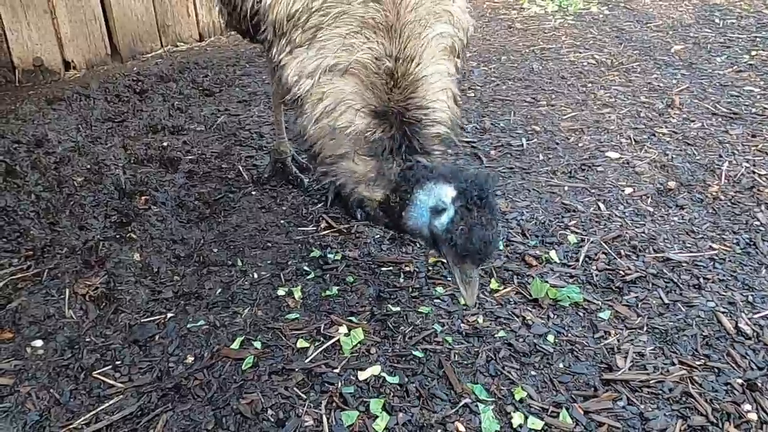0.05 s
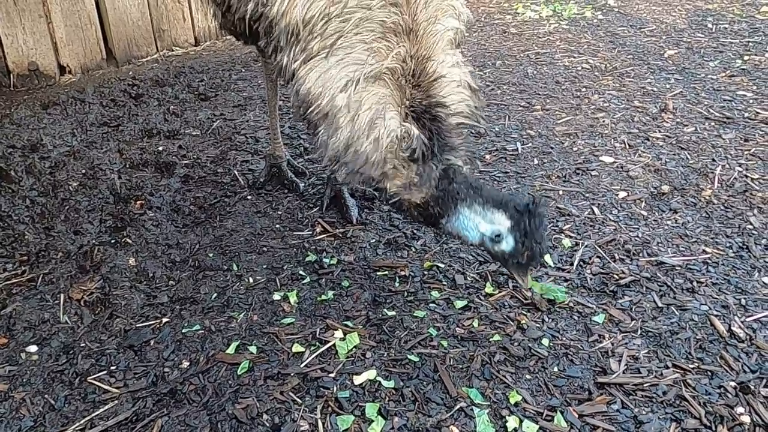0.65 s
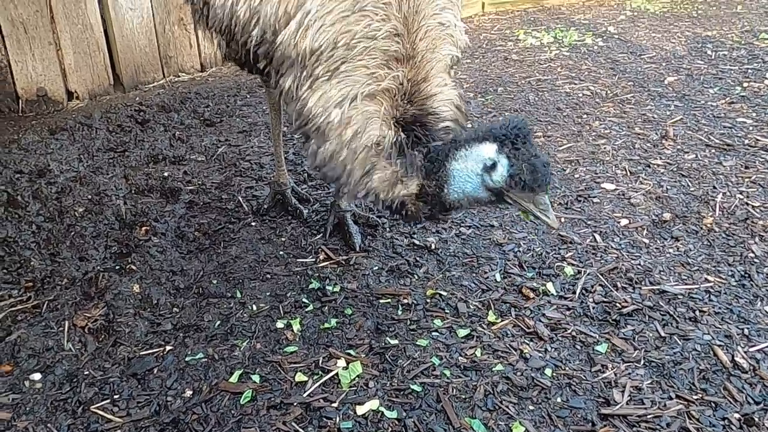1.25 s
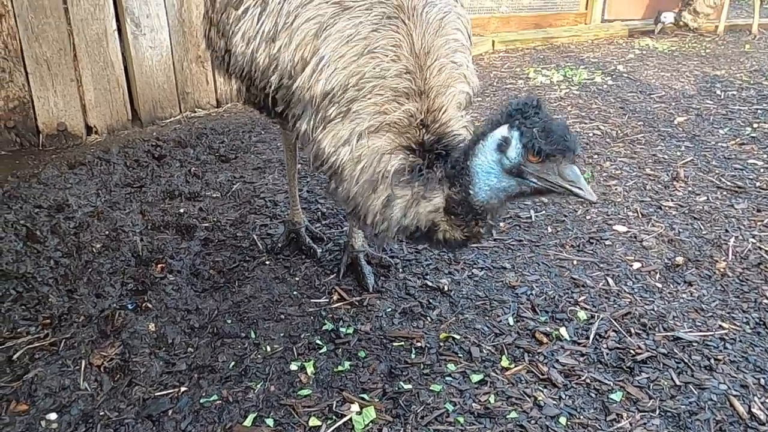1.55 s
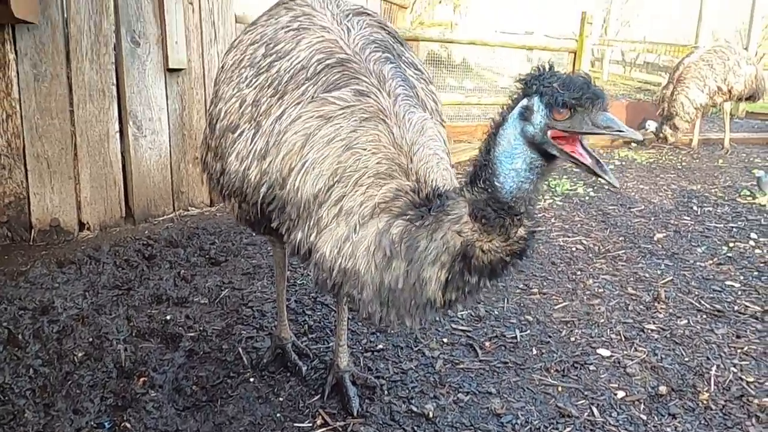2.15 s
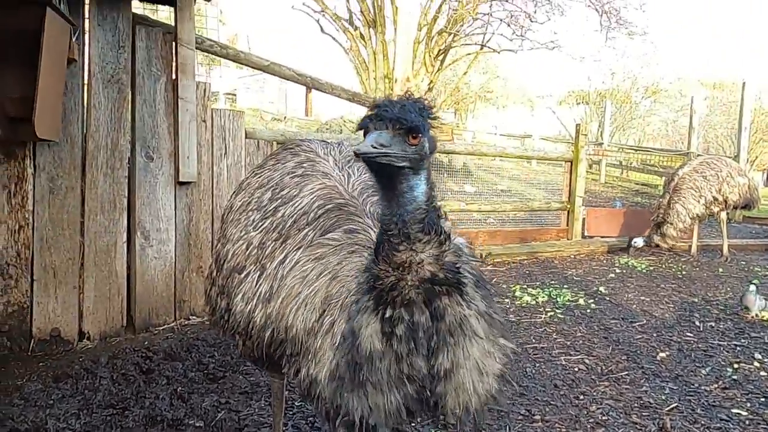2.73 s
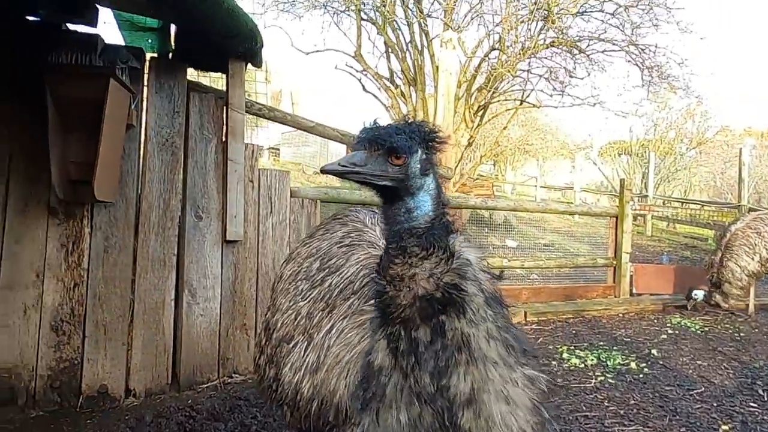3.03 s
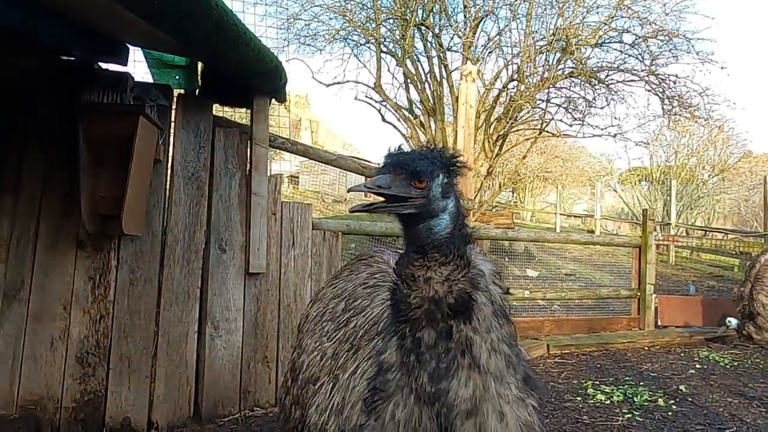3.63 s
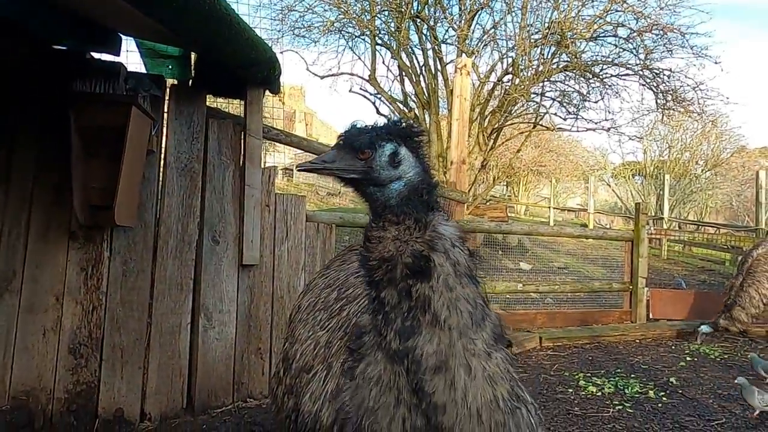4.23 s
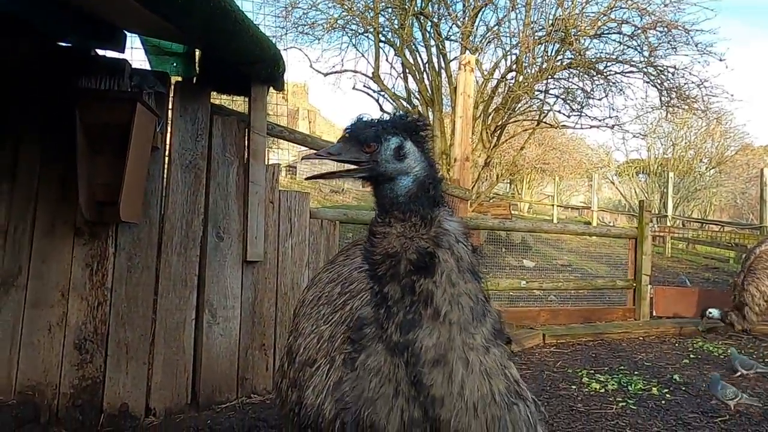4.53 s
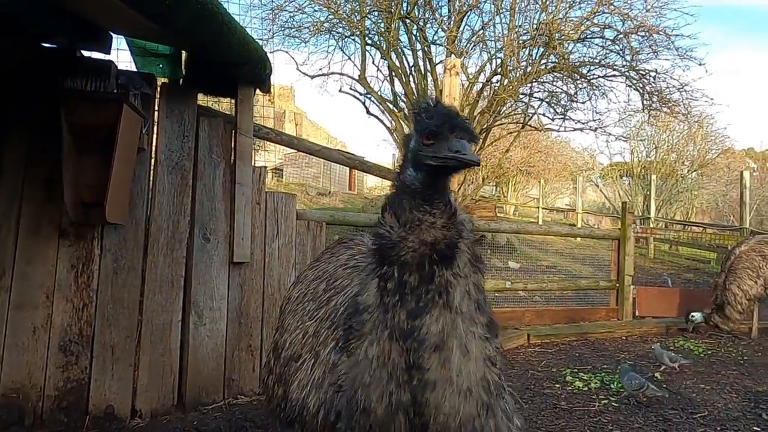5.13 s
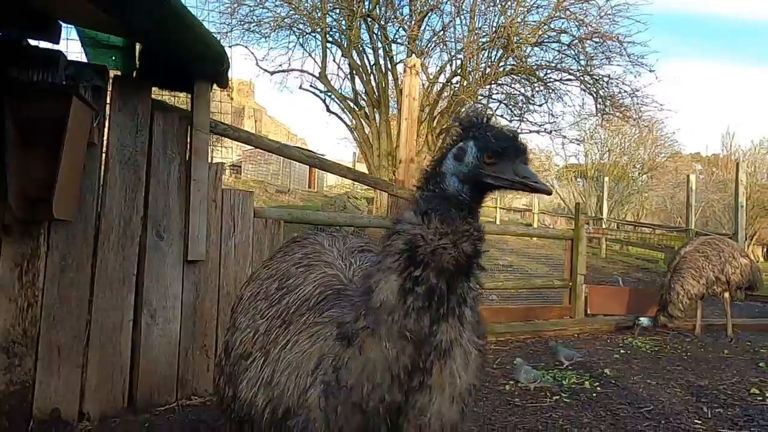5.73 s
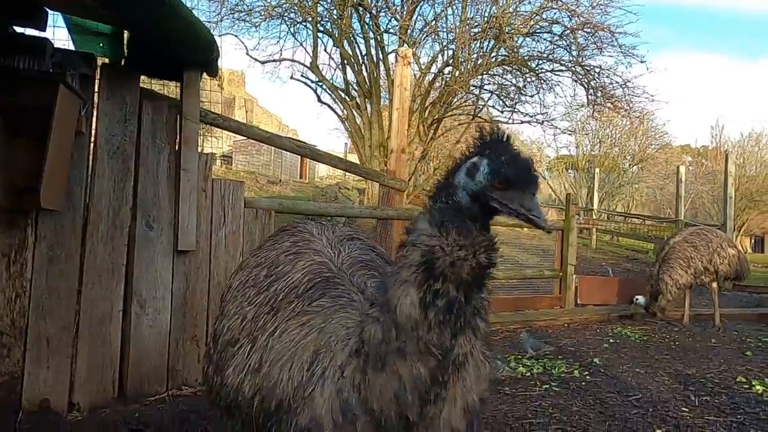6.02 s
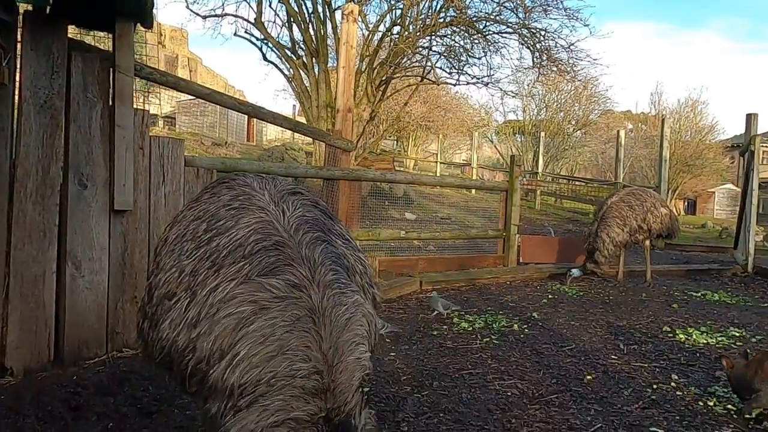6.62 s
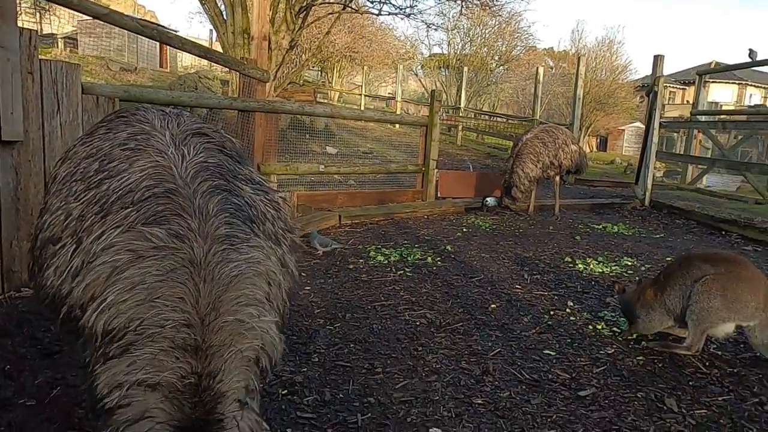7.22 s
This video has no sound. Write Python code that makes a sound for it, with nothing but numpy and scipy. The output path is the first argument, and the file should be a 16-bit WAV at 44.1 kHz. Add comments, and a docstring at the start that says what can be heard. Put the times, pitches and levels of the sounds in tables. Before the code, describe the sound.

In an outdoor yard, a small songbird slightly to the right sings thin, high whistles and then a quick warble. Wind then rumbles and thumps on the microphone, which takes a few dull knocks, louder than the song. After a lull the bird sings a second, buzzier phrase through another gust. Large birds faintly rustle and tap in wood chips, and distant traffic hums throughout.

```python
"""A small songbird sings two phrases of whistles, scoops, slurs and buzzes in a yard with wooden fences.
It sits a little right of the microphone; each note is a wavering near sine, raspier the faster it glides.
Large birds rustle and tap in the wood chips, the fences echo them and the song, and far traffic hums.
Wind rumbles and thumps right on the microphone, which takes a few knocks as it swings.
After the strongest gust the stereo image narrows to mono."""
import sys
import numpy as np
from scipy import signal
from scipy.fft import rfft, irfft, next_fast_len
from scipy.io import wavfile

SR = 44100
rng = np.random.default_rng(int(sys.argv[2]) if len(sys.argv) > 2 else 0)


def store_wav(level_fs):
    """Save 16-bit WAV to argv[1]."""
    pcm = np.round(np.clip(np.atleast_2d(level_fs), -1, 1) * 32767)
    wavfile.write(sys.argv[1], SR, pcm.T.astype(np.int16))


N = 325017
TIME = np.arange(N) / SR


def gain_of(db):
    """Decibels to a factor."""
    return 10 ** (np.asarray(db) / 20)


def unit_rms(x):
    """Scales to rms 1."""
    return x / np.sqrt(np.mean(x ** 2) + 1e-20)


def curve(rows):
    """Joins (time, value) rows by straight lines."""
    return np.interp(TIME, *np.transpose(rows))


def spectrum_at(rows, hz):
    """Reads (frequency, value) rows on a log-frequency axis."""
    f, value = np.transpose(rows)
    return np.interp(np.log(hz + 1), np.log(f + 1), value)


def add(mix, s, sound):
    """Mixes a sound in at time s."""
    part = mix[..., max(round(s * SR), 0):][..., :sound.shape[-1]]
    part += sound[..., :part.shape[-1]]


def filtered(x, gain):
    """Filters x by a gain that is a function of frequency."""
    size = next_fast_len(x.shape[-1])
    return irfft(rfft(x, size) * gain(np.fft.rfftfreq(size, 1 / SR)), size)[..., :x.shape[-1]]


def rolloff(f, corner_hz, slope):
    """Low-pass gain, one half at the corner."""
    return 1 / (1 + (f / corner_hz) ** slope)


def wander(count, hz):
    """Smooth random drift of rms about 1 that moves at up to hz."""
    noise = rng.standard_normal(max(count, SR // 4) + 4096)
    return unit_rms(filtered(noise, lambda f: rolloff(f, hz, 4)))[:count]


def noise_pair(apart):
    """White noise at the microphone's two ports: a shared part, plus and minus an unshared one."""
    mid, side = rng.standard_normal((2, N))
    return np.array([mid + apart * side, mid - apart * side])


# Far traffic as it reaches the yard: (frequency [Hz], relative level [dB])
TRAFFIC_SPECTRUM = [(30, 7), (180, 13.5), (300, 5.5), (420, -1), (650, -5.5), (1030, -0.5), (1550, -5),
                    (2000, -18), (2600, -27), (5000, -38), (14000, -38)]
# Its slow swell: (time [s], relative level [dB])
TRAFFIC_SWELL = [(0, -61.5), (1.9, -58), (3.7, -62.5), (7.37, -61.5)]
def traffic(level_db=8.5, apart=0.41, drift_db=1.0):
    """Far off: tyre roar near 1 kHz over a low engine hum, its treble lost to distance."""
    roar = unit_rms(filtered(noise_pair(apart), lambda f: gain_of(spectrum_at(TRAFFIC_SPECTRUM, f))))
    return gain_of(curve(TRAFFIC_SWELL) + level_db + drift_db * wander(N, 5.2)) * roar


# Gusts on the microphone: (time [s], level [dB])
GUSTS = [(0, -41.5), (.45, -38), (.9, -42), (2.28, -42.5), (2.41, -27), (2.5, -33), (2.88, -37),
         (2.96, -30.5), (3.27, -20), (3.52, -35.5), (4.3, -46.5), (4.55, -36.5), (4.75, -50), (5.47, -45.5),
         (5.62, -32), (6.45, -32), (6.7, -35.5), (7.37, -46.5)]
def wind(corner_hz=72, low_hz=24, slope=2.48, lumps_db=2):
    """Turbulent rumble; while the microphone swings, each port gets its own gusts."""
    apart = curve([(2.1, 0.13), (2.4, 0.57), (3.4, 0.83), (4, 0.27)])
    rumble = lambda f: f / np.hypot(f, low_hz) * rolloff(f, corner_hz, slope) * rolloff(f, 360, 4)
    air = unit_rms(filtered(noise_pair(apart) / np.hypot(1, apart), rumble))
    return gain_of(curve(GUSTS) + lumps_db * wander(N, 21)) * air


# Eddies right at the ports: (centre time [s], length [s], level [dB])
EDDIES = [(2.952, 0.065, -25), (2.985, 0.038, -19.5), (3.032, 0.051, -27), (3.136, 0.079, -23),
          (3.249, 0.062, -17.5), (3.334, 0.074, -24), (3.379, 0.0258, -27.5), (3.795, 0.044, -38.5),
          (6.433, 0.18, -23)]
def thumps(edge_hz=172, slope=3.44, low_hz=40):
    """Single eddies hit the microphone as short, dull puffs."""
    out = np.zeros((2, N))
    dull = lambda f: f / np.hypot(f, low_hz) * rolloff(f, edge_hz, slope) * rolloff(f, 4.4 * edge_hz, 10)
    for s, length, db in EDDIES:
        air = filtered(rng.standard_normal((2, SR // 2)), dull)
        swell = np.hanning(round(length * SR))
        puff = np.array([unit_rms(port[:len(swell)] * swell) for port in air])
        add(out, s - length / 2, gain_of(db) * puff)
    return out


# Bumps on the microphone's housing: (time [s], peak level [dB], pitch [Hz], rise [s])
JOLTS = [(1.958, -36.5, 426, 0.0076), (2.442, -15, 158, .005), (2.641, -27.5, 282, .005),
         (3.118, -24.5, 593, .001), (3.226, -10.5, 265.3, 0.00045), (3.23, -9.5, 380, 0.00054)]
def knocks(cycles=0.69, top_hz=1250, port_radians=1.6):
    """Each push swings back and dies in a cycle or two, out of step at the two ports."""
    out, t = np.zeros(N), np.arange(SR // 10) / SR
    for s, db, hz, rise_s in JOLTS:
        onset = 1 - np.exp(-(t / rise_s) ** 2)
        push = np.sin(2 * np.pi * hz * t) * np.exp(-t * hz / cycles) * onset
        add(out, s, gain_of(db) * push / abs(push).max())
    return np.array([filtered(out, lambda f: np.exp(.5j * side * port_radians) * rolloff(f, top_hz, 10))
                     for side in (1, -1)])


# Which port faces the wind: (time [s], left minus right [dB])
WINDWARD_SIDE = [(2.15, 0.5), (2.4, 4), (2.7, 1), (2.92, -3.5)]
def buffeting():
    """Wind, thumps and knocks lean from left to right as the microphone swings."""
    balance = gain_of(np.outer([.5, -.5], curve(WINDWARD_SIDE)))
    return balance * (wind() + thumps() + knocks())


# How long the yard rings: (frequency [Hz], time to fall 60 dB [s])
YARD_DECAY = [(2500, 0.46), (4000, 0.66), (8000, 0.24)]
def yard_echo(x, early_db=-11, tail_db=-12, soft_hz=8200, slaps=8):
    """A few slaps off the nearby fences and shed, then a thin tail from the trees."""
    t = np.arange(SR) / SR
    reflections = rng.choice([-1., 1.], (2, SR)) * (rng.random((2, SR)) < 2000 / SR) * (t > .012)
    hz, age_s, bands = signal.stft(reflections, SR, nperseg=256)
    decay = gain_of(-60 * age_s / spectrum_at(YARD_DECAY, hz)[:, None])
    tail = signal.istft(bands * decay, SR, nperseg=256)[1]
    echo = gain_of(tail_db) * tail / np.linalg.norm(tail[0])
    for delay in rng.uniform(0.0061, .065, slaps):
        for port in echo:
            add(port, delay + rng.uniform(0, 1e-4), gain_of([early_db]) / np.sqrt(slaps))
    # twigs and rough boards swallow the highest notes
    return filtered(signal.fftconvolve(x, echo, axes=1)[:, :N], lambda f: rolloff(f, soft_hz, 6))


def ring(x, hz, q):
    """One resonance of a wood chip."""
    return filtered(x, lambda f: 1 / (1 + 1j * q * (f / hz - hz / (f + 1))))


def snaps(count, per_s, spread_db=4.0):
    """Sparse clicks of rms 1 at both ports, most small and a few large."""
    size = gain_of(spread_db * np.minimum(rng.exponential(1, count), 3))
    fires = rng.random(count) < per_s / SR
    return unit_rms(size * fires * (rng.choice([-1., 1.], count) + 0.23 * rng.standard_normal((2, count))))


# Large birds shuffling on the ground: (time [s], relative level [dB])
SHUFFLING = [(0, -75), (.7, -86), (1.18, -73), (1.28, -61), (1.42, -74.5), (1.65, -73), (2.15, -87),
             (2.27, -71), (2.45, -88), (3.2, -78), (3.6, -98.5), (5.45, -79), (7.22, -75.5), (7.36, -56)]
def rustle(level_db=4.0, clumps_db=3.0, per_s=45, q=3.6, hiss_db=-4, top_hz=11000):
    """Chips of many sizes crackle in clumps over a soft brushing of feathers."""
    crackle = unit_rms(sum(ring(snaps(N, per_s), hz, q) for hz in np.geomspace(2800, 8500, 9)))
    feathers = gain_of(hiss_db) * noise_pair(1)
    shuffle = filtered(feathers + .5 * crackle, lambda f: rolloff(f, top_hz, 10))
    return gain_of(curve(SHUFFLING) + level_db + clumps_db * wander(N, 20)) * shuffle


# Beaks and feet in the chips: (time [s], relative level [dB], settling time [s], centre [Hz])
CRUNCHES = [(0.345, -61, 0.013, 5500), (0.604, -58.5, 0.0047, 6060), (0.938, -55, 0.01, 6100),
            (1.867, -61, 0.052, 4900), (2.037, -55, 0.013, 4740), (3.04, -63.5, 0.0087, 6730),
            (4.72, -62.5, 0.013, 5180), (4.864, -69, 0.053, 2940), (5.68, -59, 0.0078, 6000)]
def taps(level_db=7, snaps_per_s=1500, q=0.42):
    """Each tap is a crunch of tiny snaps that builds and settles."""
    out, t = np.zeros((2, N)), np.arange(SR // 4) / SR
    for s, db, settle_s, hz in CRUNCHES:
        force = gain_of(db + level_db) * np.sqrt(t / settle_s) * np.exp(-t / settle_s)
        add(out, s, ring(force * snaps(len(t), snaps_per_s), hz, q))
    return out


# Single clicks, centred between the ports: (time [s], relative peak level [dB], pitch [Hz])
CLICKS = [(1.653, -51.5, 7500), (1.943, -38.5, 7500), (3.818, -54.5, 6750), (4.178, -61, 5760),
          (4.775, -57.5, 5090), (6.896, -56, 4300)]
def ticks(decay_s=0.0056, q=0.91):
    """A chip snaps or a beak clicks: one dry burst of noise."""
    out, t = np.zeros(N), np.arange(SR // 4) / SR
    for s, db, hz in CLICKS:
        click = ring(rng.standard_normal(len(t)) * np.exp(-t / decay_s), hz, q)
        add(out, s, gain_of(db) * click / abs(click).max())
    return out


# Tone of the wood chips at the microphone: (frequency [Hz], gain [dB])
CHIP_SPECTRUM = [(200, -14.5), (1500, 3.5), (5000, 2), (8400, -3.5), (10500, 3), (15000, -11)]
def ground_birds():
    """Large birds rustle, tap and tick, all coloured by the bed of chips."""
    return filtered(rustle() + taps() + ticks(), lambda f: gain_of(spectrum_at(CHIP_SPECTRUM, f)))


def syrinx(hz, loudness, waver=.005, jitter=0.025, flutter_db=1.5, grit_db=3.5, overtone_db=-40,
           raspy_hz_per_s=73000, pure_above_hz=6700, pure_after_s=0.24,
           scatter=0.69, spread_s=.009, paths=10):
    """A wavering near sine, raspier the quicker it glides, reaching the microphone by several paths."""
    n = len(hz)
    glide_rasp = min(1, np.ptp(hz) * SR / n / raspy_hz_per_s) ** 2
    # short low notes are always a little hoarse
    hoarseness = 0.45 * rolloff(hz.mean(), pure_above_hz, 20) * rolloff(n / SR, pure_after_s, 2)
    rasp = max(glide_rasp, hoarseness)
    unsteady_hz = hz * (1 + jitter * rasp * wander(n, 700) + waver * wander(n, 42))
    phase = 2 * np.pi * np.cumsum(unsteady_hz) / SR
    swell = loudness * gain_of(flutter_db * wander(n, 70) + grit_db * rasp * wander(n, 220))
    direct = swell * (np.sin(phase) + gain_of(overtone_db) * np.sin(2 * phase))
    # copies off ground and branches beat against a quick slur; thin high notes scatter less
    heard = np.pad(direct, (0, SR // 30))
    share = scatter * min(1, (pure_above_hz / hz.mean()) ** 10)
    for delay in rng.uniform(0, spread_s, paths):
        add(heard, delay, share / np.sqrt(paths) * direct)
    return heard * np.sqrt(np.sum(loudness ** 2) / np.sum(heard ** 2))


def progress(length):
    """Runs from 0 to 1 through a note."""
    return np.linspace(0, 1, round(length * SR))


def syllable(hz, db, taper=0.32):
    """A note that swells and fades softly along a pitch curve."""
    return syrinx(hz, gain_of(db) * unit_rms(signal.windows.tukey(len(hz), taper)))


def contour(rows, taper=0.055):
    """Start time and sound of a note that follows its own pitch and level."""
    s, hz, db = np.transpose(rows)
    t = np.arange(s[0], s[-1], 1 / SR)
    loudness = np.interp(t, s, gain_of(db)) * signal.windows.tukey(len(t), taper)
    return s[0], syrinx(np.interp(t, s, hz), loudness)


# Upper and lower voice of one note, a list each: (time [s], pitch [Hz], level [dB])
SYRINX_SIDES = [
    [(5.803, 3890, -52.5), (5.825, 4370, -45), (5.868, 4250, -55), (5.995, 4157, -51.5), (6.013, 4090, -55)],
    [(5.83, 3630, -50.5), (5.9, 3495, -55.5), (6.06, 3600, -64.5)],
]
def two_voices(blend_db=-14, above_hz=5000):
    """Both sides of the syrinx drive each other, adding overtones at the sums of their pitches."""
    pair = np.zeros(N)
    for rows in SYRINX_SIDES:
        add(pair, *contour(rows))
    sum_tones = filtered(pair ** 2 / abs(pair).max(), lambda f: 1 - rolloff(f, above_hz, 10))
    return pair + gain_of(blend_db) * sum_tones


# Held notes: (time [s], length [s], pitch [Hz], level [dB])
HELD_NOTES = [(.53, 0.025, 7726, -35.5), (.607, 0.097, 7567, -42.5), (.809, .098, 8220, -50.5),
              (.906, 0.047, 8200, -45), (.955, 0.069, 7860, -50.5), (1.04, 0.065, 7865, -49),
              (1.19, 0.022, 2760, -60.5), (1.198, 0.022, 3730, -50), (1.238, 0.027, 4606, -45),
              (1.546, .024, 2540, -60), (1.616, 0.012, 4580, -46), (1.724, 0.037, 4080, -56.5),
              (5.392, 0.033, 3600, -52), (5.425, 0.047, 3210, -53.5), (5.55, 0.06, 3005, -52.5),
              (5.766, 0.034, 3348, -40.5), (6.26, 0.03, 6220, -43.5), (6.903, 0.045, 4450, -58.5)]
def whistles(sag=0.021, bend=0.041, bend_s=.007):
    """Each bends up into its pitch, sinks a little and drops away."""
    for s, length, hz, db in HELD_NOTES:
        u = progress(length)
        ends = np.exp(-u * length / bend_s) + np.exp((u - 1) * length / bend_s)
        yield s, syllable(hz * (1 + sag * (.5 - u) - bend * ends), db)


# U-shaped notes of the warble: (time [s], length [s], lowest pitch [Hz], level [dB])
WARBLE_NOTES = [(1.149, 0.034, 3054, -48), (1.216, 0.027, 3430, -39), (1.263, 0.027, 3660, -33.5),
                (1.318, 0.036, 3010, -40.5), (1.39, 0.016, 3390, -38.5), (1.504, 0.022, 3077, -39.5),
                (1.573, 0.025, 3490, -41.5), (1.629, 0.03, 3480, -42)]
def scoops(fall=.13, rise=0.38, dip_at=.46):
    """Each sinks gently, then flicks upward."""
    for s, length, hz, db in WARBLE_NOTES:
        u = progress(length) - dip_at
        lift = np.where(u < 0, fall * (u / dip_at) ** 2, rise * (u / (1 - dip_at)) ** 2)
        yield s, syllable(hz * (1 + lift), db)


# Buzzy notes: (time [s], length [s], start pitch [Hz], end pitch [Hz], vibrato depth [share], level [dB])
VIBRATO_NOTES = [(5.355, 0.059, 4950, 3860, .03, -61.5), (5.478, 0.026, 3460, 3960, 0.032, -56),
                 (5.592, 0.041, 3040, 3400, 0.021, -46.5), (5.627, 0.042, 3650, 3715, 0.059, -46.5),
                 (5.722, 0.048, 4420, 3760, 0.03, -42), (6.154, 0.051, 7870, 7080, 0.073, -57),
                 (6.759, 0.03, 4096, 3830, 0.037, -40), (6.831, 0.021, 4100, 4110, 0.039, -47.5)]
def buzzes(vibrato_hz=185):
    """Each is a straight glide under a fast, uneven vibrato."""
    for s, length, from_hz, to_hz, depth, db in VIBRATO_NOTES:
        u = progress(length)
        glide = from_hz + (to_hz - from_hz) * u
        vibrato = np.sin(2 * np.pi * vibrato_hz * length * u + 2 * wander(len(u), vibrato_hz / 2))
        yield s, syllable(glide * (1 + depth * vibrato), db)


# Falling notes: (time [s], length [s], middle pitch [Hz], level [dB])
FALLING_NOTES = [(1.256, 0.023, 4270, -39), (1.374, 0.0086, 3930, -55), (1.436, 0.018, 3920, -43),
                 (1.667, 0.027, 4260, -49), (1.702, 0.027, 4000, -49), (6.175, 0.021, 6970, -46.5),
                 (6.245, 0.014, 6000, -44), (6.394, 0.0097, 4870, -39), (6.41, 0.013, 4300, -42.5),
                 (6.572, 0.048, 4190, -44.5)]
def slurs(typical_octaves=0.56, typical_s=0.022, growth=0.48, skew=1.5):
    """Each fall gathers speed; longer notes fall further."""
    for s, length, hz, db in FALLING_NOTES:
        octaves = typical_octaves * (length / typical_s) ** growth
        yield s, syllable(hz * 2 ** (octaves * (.5 ** skew - progress(length) ** skew)), db)


# Notes that slide and arch, a list each: (time [s], pitch [Hz], level [dB])
SLIDING_NOTES = [
    [(0, 3896, -43), (.028, 3920, -56.5), (.142, 3895, -59.5)],
    [(.143, 3530, -62.5), (.222, 4216, -66.5)],
    [(.325, 7250, -72.5), (.36, 7570, -52), (.405, 7595, -33), (.51, 7640, -35.5), (.525, 7600, -37)],
    [(5.105, 4190, -76), (5.19, 2760, -75), (5.206, 3140, -73.5), (5.27, 3270, -71.5)],
    [(6.19, 5690, -55), (6.218, 6480, -42.5), (6.247, 6560, -49)],
    [(6.292, 5900, -44), (6.311, 5630, -41.5), (6.319, 5470, -34.5), (6.34, 4970, -53), (6.355, 5190, -36),
     (6.372, 5690, -50)],
    [(6.481, 3630, -56), (6.491, 4070, -34.5), (6.5, 4450, -37), (6.515, 6240, -58), (6.526, 5770, -71),
     (6.545, 3670, -38.5)],
    [(6.657, 2990, -59), (6.669, 3300, -42), (6.68, 3770, -38.5), (6.688, 4680, -51), (6.708, 5570, -79),
     (6.725, 3800, -48.5)],
]
def songbird(left_lag_s=2.3e-5):
    """The whole song, from a little to the right: it reaches the left port later."""
    song = two_voices()
    for s, note in [*whistles(), *scoops(), *buzzes(), *slurs(), *map(contour, SLIDING_NOTES)]:
        add(song, s, note)
    left = filtered(song, lambda f: np.exp(-2j * np.pi * f * left_lag_s))
    return np.array([left, song])


def scene(song_db=1):
    """Birds in the yard, traffic far behind them, wind right on the microphone."""
    birds = gain_of(song_db) * songbird() + ground_birds()
    return birds + yard_echo(birds) + traffic() + buffeting()


def record(dry, left_db=1.56, narrow_from_s=3.49, narrow_db_per_s=36.5,
           dull_hz=8800, shelf_db=-15, edge_hz=15500):
    """A stereo microphone, keener on the left, dull in the top treble; its image closes to mono."""
    left, right = dry * gain_of([[left_db / 2], [-left_db / 2]])
    width = gain_of(-narrow_db_per_s * np.maximum(TIME - narrow_from_s, 0))
    mid, side = (left + right) / 2, (left - right) / 2 * width
    shelf = lambda f: gain_of(shelf_db) + (1 - gain_of(shelf_db)) * rolloff(f, dull_hz, 20)
    ports = filtered(np.array([mid + side, mid - side]), shelf)
    band_limit = signal.firwin(511, edge_hz, window=("kaiser", 9), fs=SR)
    return signal.oaconvolve(ports, band_limit[None], "same")


dry = scene()
out = record(dry)
store_wav(out)
```